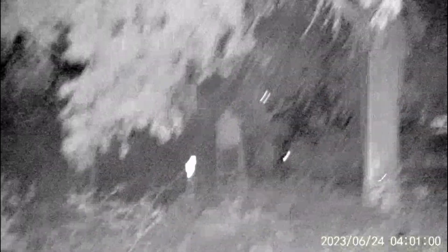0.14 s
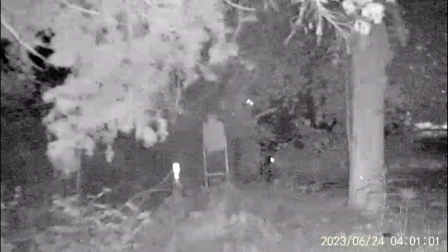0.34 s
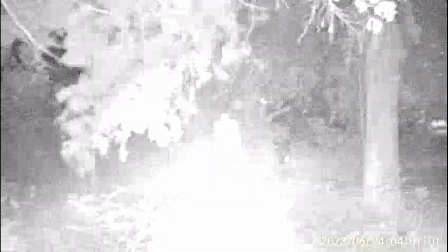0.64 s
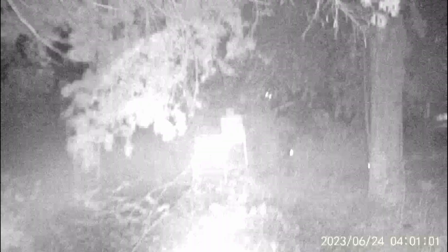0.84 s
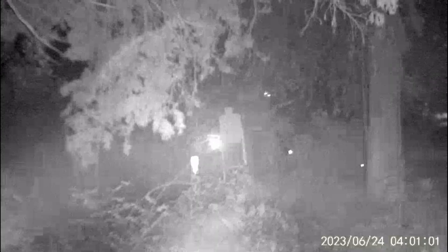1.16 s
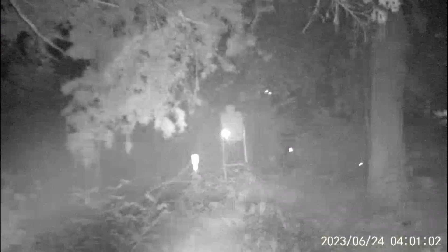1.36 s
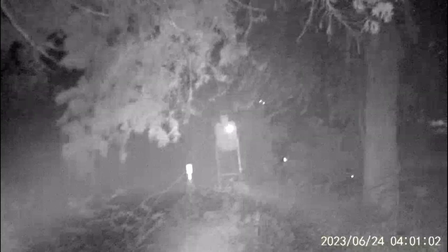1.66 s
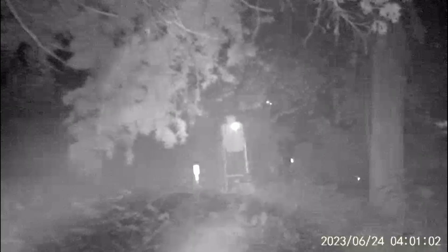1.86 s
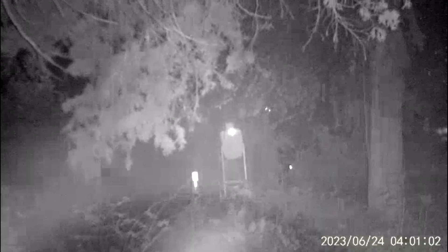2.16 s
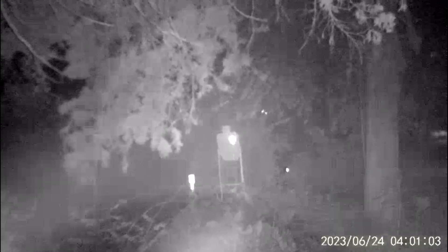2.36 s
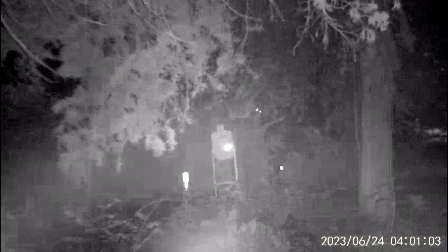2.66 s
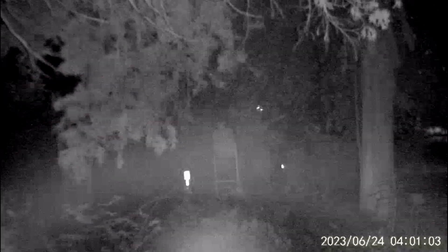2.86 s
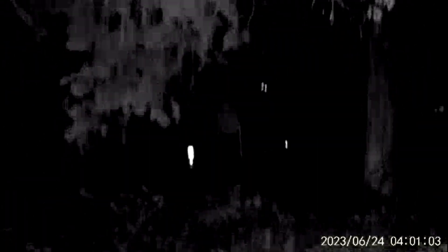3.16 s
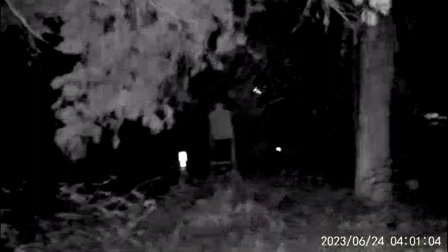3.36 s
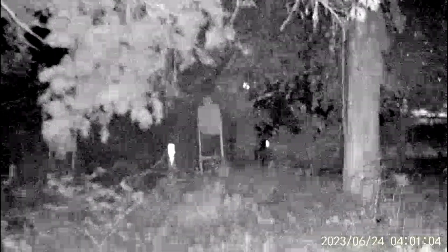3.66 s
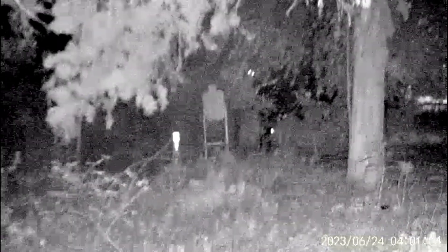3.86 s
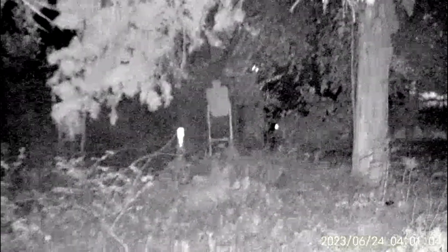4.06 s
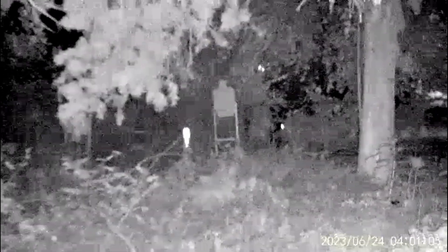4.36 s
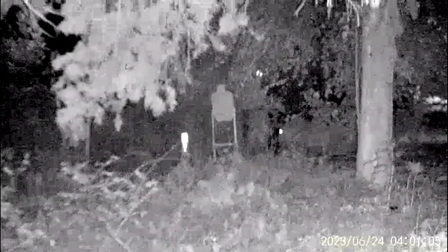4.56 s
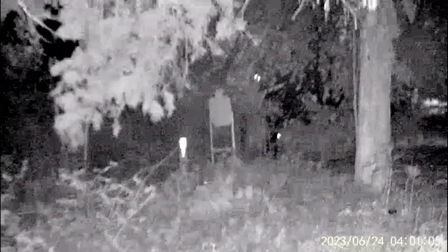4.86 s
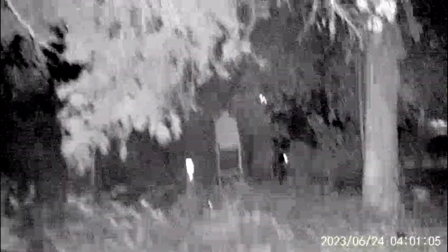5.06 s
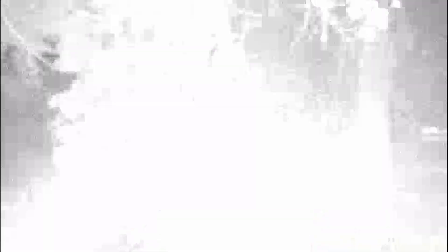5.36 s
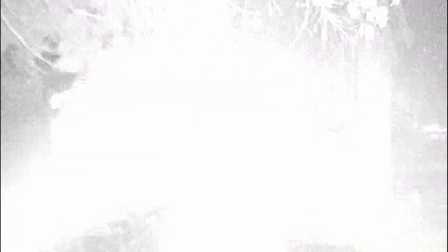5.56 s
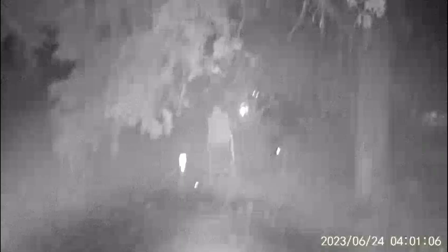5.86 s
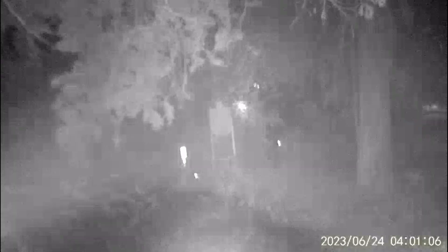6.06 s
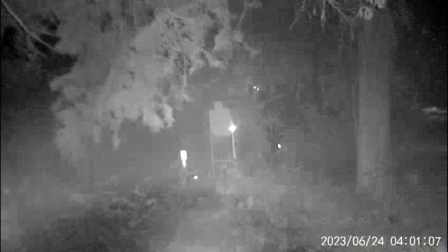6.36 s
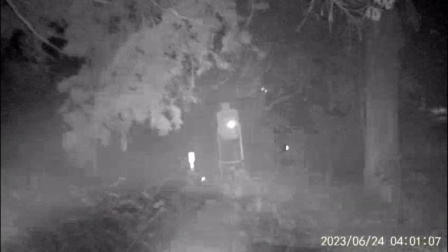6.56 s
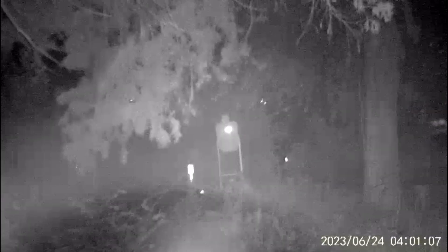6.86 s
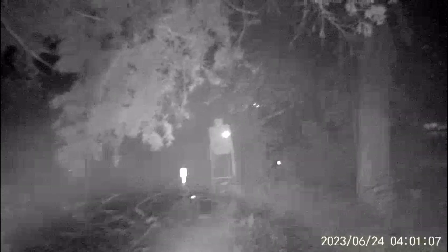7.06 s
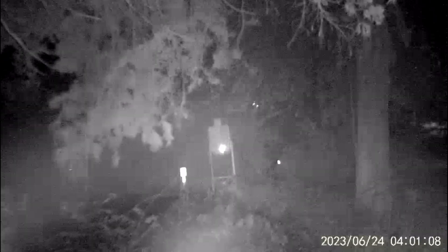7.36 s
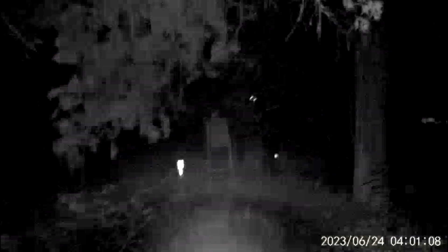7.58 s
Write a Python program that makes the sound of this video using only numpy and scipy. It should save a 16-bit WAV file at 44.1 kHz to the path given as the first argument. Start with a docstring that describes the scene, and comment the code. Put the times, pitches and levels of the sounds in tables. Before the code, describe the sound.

A quiet outdoor night: low rumble, soft air, distant traffic and thin insect hiss. Close to the microphone, cloth rustles and small taps lead to a sharp dry trigger click at 0.36 seconds. Far tyre roar swells gently around 1.5, then fades. A light tick at 1.9 precedes two loud, rapid action cycles at 2.2 and 2.4: latch snap, brief gear whirr, hard clack, swing back and rattling seat, with a short metallic after-ring. Another click lands at 2.8. Sleeves and soft handling sounds pass around 3.3 to 3.6; faint pulsing crickets swell near 4.2. More rustling leads to a fuller click at 5.1, followed immediately by a thin bright reset snap with a tiny spring ring. After quiet, a second, somewhat softer pair of whirring cycles comes at 6.85 and 7.03. A final crisp click at 7.43 gives way to slight rustle and a dull bump.

```python
"""A rifle is dry-fired outdoors at night, right by the microphone: single trigger clicks, two quick pairs of action cycles.
In each cycle a latch lets go, a small drive whirs up to speed, and the parts stop, swing back and seat.
Contacts are bursts of tiny impacts ringing damped modes; the drive is gliding gear tones over grinding noise.
Sleeves rustle as shaped noise. Behind lie a low rumble, far traffic that fades, faint pulsed crickets and a thin hiss.
The recorder's gain ducks in the loud cycles."""
import sys
import numpy as np
from scipy import signal
from scipy.fft import rfft, irfft, next_fast_len
from scipy.io import wavfile
from scipy.ndimage import map_coordinates

SR = 44100
rng = np.random.default_rng(int(sys.argv[2]) if len(sys.argv) > 2 else 0)


def unload_audio(sound):
    """Save the sound as a 16-bit wav file, at the path given as the first command line argument."""
    columns = np.transpose(np.atleast_2d(sound))
    # keep every value between -1 and 1, then stretch to whole-number steps
    steps = np.round(np.clip(columns, -1, 1) * 32767)
    wavfile.write(sys.argv[1], SR, steps.astype(np.int16))


N = 340452
TIME = np.arange(N) / SR

# Contact tables: each level_db is taken before the gain_db given to clicks();
# low_db and high_db tilt the low and high modes, before a random scatter.
# trigger clicks: start_s, level_db, low_db, high_db
TRIGGER = [(0.3572, -20, 4, -2.5), (2.8274, -19, -5, -1.5), (5.0922, -15, 2, 0), (7.4327, -15, -2.5, -1.5)]
# the sear slips just before the hammer falls: start_s, level_db, low_db, high_db
SEAR = [(0.3526, -35, -3, -3.5), (2.8248, -22.5, -3, -2), (5.0895, -29, -2, 3), (7.4287, -24.5, 4, -4)]
# the trigger resets, one contact: start_s, level_db, low_db, high_db
RESET = (5.161, -19, -0.5, 1)
# ringing spring of the reset: pitch_hz, level_db, t60_s
RESET_PING = (2715, -40, 0.19)
# light metal contacts: start_s, level_db, low_db, high_db
TICKS = [(1.9325, -30.5, -2, -11), (2.3702, -28.5, -3, -3), (6.8089, -31.5, -4.5, -11.5),
         (6.9115, -17.5, -5.5, 0.5), (7.0112, -31.5, 3, -1), (7.6465, -42.5, 0, -3)]
# sharp snags and bounces within the cycles: start_s, level_db, low_db, high_db
SNAGS = [(2.2176, -20.5, -1, -4), (2.2568, -13.5, -2, -4.5), (2.4535, -10.5, 1, -2), (6.8752, -25.5, 3, -4),
         (6.9148, -12.5, -9, -3.5), (7.0662, -27, 6, -5), (7.1412, -18, 1, -4)]
# soft handling taps: start_s, level_db (before gain_db), pitch_hz
TAPS = [(0.102, -45.5, 2280), (0.2944, -44.5, 2820), (0.3192, -33.5, 3530), (0.856, -58, 4450),
        (3.097, -48, 1900), (3.426, -38.5, 2470), (3.456, -45, 3660), (3.5837, -43.5, 2570),
        (4.5439, -55, 2780), (4.6478, -51.5, 2384), (5.0479, -42, 3700), (5.6516, -57.5, 4000)]
# dull bumps of the stock against the body: peak_s, level_db
BUMPS = [(0.335, -38), (2.884, -36.5), (3.37, -40), (7.69, -39.5)]
# moves of the arms: turn_s (rise gives way to fall), level_db, rise_db_per_s, fall_db_per_s
MOVES = [(0.33, -52.5, -0.5, 37.5), (2.62, -59, 40, 33), (3.26, -47.5, 55.5, 57), (3.65, -67, 17, 22),
         (4.73, -57.5, 45, 32), (5.04, -46.5, 64.5, 54), (5.22, -49, 58, 77.5), (7.28, -62.5, 30, 54),
         (7.7, -54, 33, 30)]
# cycles of the action: unlatch_s, top_speed_s, stop_s, swing_s, seat_s,
# stop_db (level before gain_db), seat_low_db (low modes of the seating)
CYCLES = [(2.1854, 2.241, 2.2545, 2.2704, 2.2968, -9.5, 0.5),
          (2.3874, 2.439, 2.45, 2.4657, 2.4842, -8.5, -1),
          (6.8506, 6.898, 6.9143, 6.9266, 6.9595, -14.5, -1.5),
          (7.0347, 7.086, 7.103, 7.118, 7.1356, -17, -0.5)]

# What each part rings with, in seven tables: pitch_hz, width_hz, level_db (relative)
SEAR_MODES = [(1568, 200, -13.5), (2830, 440, 0), (3300, 300, -4.5), (4800, 350, -8), (7500, 600, -11.5),
              (8650, 500, -10), (14600, 2000, -23.5)]
TRIGGER_MODES = [(580, 130, -7.5), (1056, 120, -15.5), (1574, 147, -4.5), (2150, 140, -5), (2790, 270, -1),
                 (3130, 250, -4), (3580, 140, -7), (4400, 250, -4.5), (4930, 200, -5.5), (5970, 260, -4),
                 (7120, 380, -3.5), (8570, 330, 0), (9510, 270, -7), (11200, 460, -12), (14000, 1300, -12)]
RESET_MODES = [(1060, 150, -9.5), (1570, 200, -9), (2570, 210, -7.5), (3670, 160, -4), (4620, 370, 1.5),
               (5530, 170, -1.5), (7130, 330, 1.5), (8500, 300, -6), (10000, 400, -9), (11070, 450, -6),
               (13600, 600, -8), (15300, 450, -9)]
UNLATCH_MODES = [(560, 200, -21), (940, 86, -6), (1520, 170, -8), (1920, 200, -1), (2360, 410, -4),
                 (3380, 240, -2), (4130, 510, -7.5), (4896, 280, -4), (6050, 650, -14.5), (8400, 290, -13),
                 (13100, 250, -8.5), (15000, 500, -14)]
STOP_MODES = [(850, 370, -16.5), (1500, 160, -2), (2070, 300, -12.5), (3030, 380, -4), (4060, 270, -6),
              (4680, 210, -9.5), (7300, 410, -10), (9200, 150, -15.5), (14150, 300, -16)]
SWING_MODES = [(880, 140, -6), (1570, 200, -14), (2470, 140, 3.5), (2880, 220, 1), (3300, 260, -9.5),
               (4320, 220, 2), (4700, 200, -3.5), (5740, 310, -5.5), (8600, 400, -5.5), (15400, 2700, -22)]
SEAT_MODES = [(599, 220, -18.5), (966, 95, -1), (1470, 120, -3.5), (2350, 540, -4.5), (3186, 210, 2),
              (4370, 300, 1), (4950, 200, -8), (5806, 250, -9), (7240, 560, -2.5), (8710, 260, -14.5),
              (14400, 900, -18.5)]
# the modes of light contacts and small parts: pitch_hz, width_hz, level_db (relative)
TICK_MODES = [(1510, 180, -2), (2340, 1100, 1), (3070, 770, -2.5), (4200, 1100, -12), (7670, 790, -1.5)]
# springs that ring on after the contacts: pitch_hz, level_db (before a 27 dB cut), t60_s
SPRINGS = [(930, -43.5, 0.53), (1080, -41.5, .3), (1640, -39.5, 0.84), (2740, -36.5, 0.1),
           (2850, -35, 0.13), (3320, -42.5, 0.2), (3900, -40, .14), (4850, -42, .15), (7450, -43, .12)]
# other gear tones: multiple of the tooth rate, level_db (relative)
GEARS = [(0.212, -4), (.375, -5.5), (.5, 2), (.625, -6), (2, -15.5), (3, -13.5), (4, -17.5)]

# Noise colours; each is brought to rms 1 before its level is set.
# sliding cloth: freq_hz, level_db (per Hz, relative)
CLOTH = [(500, -29.5), (1500, -6), (2400, -2), (5000, -1.5), (7800, -2), (10500, -11.5), (14000, -8.5),
         (16000, -16)]
# grinding of the drive: freq_hz, level_db (per Hz, relative)
GRIND = [(180, -59), (300, -15), (950, -9.5), (1080, -2.5), (1230, -11), (1490, 0), (1750, -10), (2360, -9),
         (3520, -5), (4090, -12.5), (5700, -15.5), (7570, -15.5), (10900, -24.5), (11700, -31),
         (14500, -24.5), (16000, -40.5)]
# night air: freq_hz, level_db (per Hz, relative)
AIR = [(12, -46), (20, -25.5), (60, 0), (150, -9), (255, -15), (377, -11), (410, -8.5), (446, -9),
       (499, -8.5), (759, -11), (1480, -18), (2100, -26), (3340, -36.5), (4420, -40.5), (5380, -45),
       (8300, -48), (10600, -64.5), (13300, -55.5), (16000, -57.5)]
# low outdoor rumble: freq_hz, level_db (per Hz, relative)
RUMBLE = [(13, -42), (22, -15.5), (46, -5.5), (65, 3), (106, -3), (129, -4), (170, -4), (257, -10.5),
          (300, -26), (390, -54), (660, -120)]
# far roar of tyres: freq_hz, level_db (per Hz, relative)
TYRES = [(250, -23), (550, 0.5), (900, 0), (1500, -11), (2600, -29), (5000, -49)]

# decay of the scatter from things nearby: freq_hz, t60_s
SURROUND = [(300, 0.22), (2000, 0.19), (4500, 0.21), (7500, 0.18), (14000, 0.21)]
# far traffic hums that draw away: pitch_hz, level_db (at the start), fade_db_per_s, waver_hz
HUMS = [(421, -51.5, 2.3, 1.6), (492.3, -52, 3, 8)]
# far crickets: pitch_hz, level_db (before the swell), pulses_per_s (mean)
CRICKETS = [(4240, -75.5, 20), (4430, -74, 28), (4900, -81.5, 42)]

# the same in every cycle: level_db (before gain_db), low_db, high_db
UNLATCH_BLOW, SWING_BLOW, REBOUND_BLOW = (-12, .3, .3), (-13, .3, -4.5), (-20.5, 3, -8)
# colour of the stop: low_db, high_db
STOP_COLOUR = (-.5, -2)
SEAT_DB, SEAT_HIGH_DB = -8.5, -2.5  # seating blow before gain_db, and tilt of its high modes
REBOUND_S = .0108  # the parts rebound this long after the swing

# contacts: spread of the tiny impacts, depth of spectral levelling (share of the mean),
# random shift of the modes (share), spread of the low and high tilts
CHATTER_SPIKE_DB, CHATTER_NOTCH = 4.5, .9
MODE_SHIFT, BLOW_SCATTER_DB = .012, 1
TICK_TOP_HZ = 7960  # light contacts are soft: their treble rolls off above this
TAP_WIDTH_HZ = 300
BUMP_HZ, BUMP_S = 62, 0.018  # pitch, half width
SPRING_BLUR_HZ = 32  # wander of the springs' pitch
SLIDE_WAVER_DB, SLIDE_GRAIN_DB = 1.5, 1.24  # slow and fine unevenness of the cloth

# drive: gear tooth rate towards the start, at the top, coasting; half widths of rise and sag
SLOW_HZ, FAST_HZ, COAST_HZ = 2850, 3640, 2850
SURGE_S, SAG_S = .021, .036
DRIVE_LAG_S = 0.0039  # after the latch
GRIND_DB, RATTLE_DB = -35.5, 3  # grinding level, and depth of its uneven bursts
WHINE_DB, WHINE_DB_PER_OCTAVE, TOOTH_DB = -41, 4, -2  # whine at top speed; tooth tone relative to it
SQUEAL_DB, LOAD_LEAD_S, LOAD_S = -30, 0.0077, 0.011  # load peaks this long before top speed; half width
GRIT_DB, GRIT_SPREAD_DB = -34, 2.5  # catching teeth: level before gain_db, spread
CLATTER_DB, CLATTER_GAP_S, CLATTER_DB_PER_S = -26, 0.0035, 551  # level before gain_db, spacing scale, decay

TYRES_DB, TYRES_S, TYRES_WIDTH_S = -50, 1.55, .8  # peak level, when it is loudest, half width
AIR_DB, AIR_FADE_DB, AIR_FADE_S = -45.5, 1.38, 5  # level at the start, drop, time the drop takes
HISS_DB = -72.5  # before the swell
CRICKET_SWELL_DB, CRICKET_SWELL_S, CRICKET_SWELL_WIDTH_S = 5.5, 4.15, .75  # height, peak, half width
TRILL_SCATTER = .3  # unevenness of the pulse rate, share

DUCK_DB, DUCK_S = -18.5, 0.07  # gain turns down near this rms level, and follows it this slowly
TOP_HZ = 16100  # band limit of the recorder


def amp(db):
    """Decibels to gain."""
    return 10 ** (np.asarray(db) / 20)


def unit(x):
    """x at rms 1."""
    return x / np.sqrt(np.mean(x ** 2) + 1e-20)


def along(points, hz):
    """(Hz, value) points read on a log frequency axis."""
    f, v = np.transpose(points)
    return np.interp(np.log(hz + 1), np.log(f + 1), v)


def wobble(rate):
    """A smooth random curve, rate knots a second."""
    knots = rng.standard_normal(int(N * rate / SR) + 4)
    return map_coordinates(knots, [TIME * rate])


def filtered(x, gain):
    """x times a gain that is a function of frequency."""
    m = next_fast_len(N + SR // 2)
    return irfft(rfft(x, m) * gain(np.fft.rfftfreq(m, 1 / SR)), m)[:N]


def noise(spectrum):
    """Noise of rms 1 with the given colour."""
    return unit(filtered(rng.standard_normal(N), lambda hz: amp(along(spectrum, hz))))


def causal(gain):
    """The minimum-phase response with this gain: it rings only after the blow."""
    cepstrum = irfft(np.log(np.maximum(gain, 1e-6)))
    half = len(cepstrum) // 2
    return np.exp(rfft(np.r_[cepstrum[0], 2 * cepstrum[1:half], np.zeros(half)]))


def chatter(t, life, count=3):
    """Force of two parts meeting: a few ms of tiny, uneven impacts that leave a few spectral notches."""
    envelope = np.sqrt(t / life) * np.exp(-t / life)
    spikes = amp(CHATTER_SPIKE_DB * rng.standard_normal(len(t)))
    force = rng.standard_normal(len(t)) * spikes * envelope
    for _ in range(count):
        # level the strong bands, then keep the burst short
        z = rfft(force)
        levelled = z / np.hypot(np.abs(z), CHATTER_NOTCH * np.abs(z).mean())
        force = irfft(levelled) / (1 + (t / (2 * life)) ** 4)
    return force


def clicks(contacts, modes, life, gain_db, size=2048):
    """Every contact chatters into damped modes, randomly shifted, with its low or high ones favoured."""
    out = np.zeros(N + size)
    t, hz = np.arange(size) / SR, np.fft.rfftfreq(size, 1 / SR)
    centres, widths, levels = np.transpose(modes)[:, :, None]
    # small parts radiate little far below their lowest mode, from about a seventh of its pitch down
    small = hz ** 2 / (hz ** 2 + (0.15 * modes[0][0]) ** 2)
    for s, db, low_db, high_db in contacts:
        c = centres * (1 + MODE_SHIFT * rng.standard_normal(centres.shape))
        resonance = (amp(levels) * hz * widths) ** 2 / ((c * c - hz * hz) ** 2 + (hz * widths) ** 2)
        body = np.sqrt(np.sum(resonance, axis=0))
        low_db, high_db = rng.normal([low_db, high_db], BLOW_SCATTER_DB)
        colour = amp(along([(1700, low_db), (2300, 0.0088), (5300, 0.0074), (6700, high_db)], hz))
        click = irfft(rfft(chatter(t, life)) * causal(body * small * colour))
        out[round(s * SR):][:size] += amp(db + gain_db) * unit(click)
    return out[:N]


def chorus_db():
    """The insect chorus swells for a while, along a bell curve in dB."""
    return CRICKET_SWELL_DB * np.exp(-((TIME - CRICKET_SWELL_S) / CRICKET_SWELL_WIDTH_S) ** 2)


def traffic():
    """Far traffic: wavering hums that draw away, and a tyre roar that swells once and fades."""
    hum = np.zeros(N)
    for hz, db, fade, waver_hz in HUMS:
        level = amp(db - fade * TIME + 2 * wobble(5))
        hum += level * np.sin(2 * np.pi * np.cumsum(hz + waver_hz * wobble(20)) / SR)
    swell = np.exp(-((TIME - TYRES_S) / TYRES_WIDTH_S) ** 2)
    return hum + amp(TYRES_DB) * swell * noise(TYRES)


def night():
    """Low rumble, soft air noise and far traffic, with a narrow band of insect hiss."""
    rumble = amp(-51.0 + 1.2 * wobble(7.5)) * noise(RUMBLE)
    air_db = AIR_DB - AIR_FADE_DB * np.clip(TIME / AIR_FADE_S, 0, 1) + 0.56 * wobble(1.7)
    air = amp(air_db) * noise(AIR)
    hiss = noise([(3600, -27.5), (4200, -1.5), (4500, -2.5), (5200, -27.5)])
    return rumble + air + traffic() + amp(HISS_DB + chorus_db()) * hiss


def crickets():
    """A few far crickets trill in quick pulses of uneven spacing, strength and pitch."""
    out = np.zeros(N)
    for hz, db, rate in CRICKETS:
        pulses = np.sin(np.pi * np.cumsum(rate * (1 + TRILL_SCATTER * wobble(30))) / SR) ** 2
        tone = np.sin(2 * np.pi * np.cumsum(hz + 50 * wobble(120)) / SR)
        out += amp(db + chorus_db() + 3 * wobble(17)) * pulses * tone
    return out


def sleeves():
    """Cloth slides as the rifle is raised and lowered: noise that swells and ebbs, with a fine uneven grain."""
    power = np.zeros(N)
    for s, db, rise, fall in MOVES:
        power += amp(db - np.maximum(rise * (s - TIME), fall * (TIME - s))) ** 2
    uneven = amp(SLIDE_WAVER_DB * wobble(18) + SLIDE_GRAIN_DB * wobble(700))
    return np.sqrt(power) * unit(uneven * noise(CLOTH))


def handling():
    """Soft taps of the hands and fittings: one narrow resonance on a broad, dull knock."""
    out = np.zeros(N)
    for s, db, hz in TAPS:
        modes = [(hz, TAP_WIDTH_HZ, 0), (2800, 2000, -13)]
        out += clicks([(s, db, -3, -6)], modes, life=0.0024, gain_db=-12.0)
    return out


def bumps():
    """The stock bumps softly: a low push that swells and dies within a few periods."""
    out = np.zeros(N)
    for s, db in BUMPS:
        t = TIME - s
        out += amp(db) * np.exp(-(t / BUMP_S) ** 2) * np.sin(2 * np.pi * BUMP_HZ * t)
    return out


def trigger_clicks():
    """The sear slips, then the hammer falls: two chattering contacts, each ringing its own modes."""
    slip = clicks(SEAR, SEAR_MODES, life=0.0019, gain_db=-6.5)
    return slip + clicks(TRIGGER, TRIGGER_MODES, life=0.0021, gain_db=-7.0)


def springs(x):
    """Lightly damped springs, shaken by the contacts; their coils touch, which blurs the pitch."""
    t = TIME[:SR // 2]
    ring = np.zeros(len(t))
    for hz, db, t60 in SPRINGS:
        pitch_hz = hz + SPRING_BLUR_HZ * wobble(250)[:len(t)]
        ring += amp(db - 27.0 - 60 * t / t60) * np.sin(2 * np.pi * np.cumsum(pitch_hz) / SR)
    return signal.fftconvolve(x, ring)[:N]


def surroundings(x):
    """A short, weak scatter from things nearby: decaying noise whose decay time varies with pitch."""
    hz, t, z = signal.stft(rng.standard_normal(SR // 2), SR, nperseg=256)
    decay = amp(-60 * t / along(SURROUND, hz)[:, None])
    tail = signal.istft(z * decay, SR, nperseg=256)[1]
    return signal.fftconvolve(x, tail / np.linalg.norm(tail))[:N]


def light_contacts():
    """Light metal parts touch softly, so the treble of their broad modes rolls off."""
    ticks = clicks(TICKS, TICK_MODES, life=0.0023, gain_db=-10.5)
    return filtered(ticks, lambda hz: 1 / np.sqrt(1 + (hz / TICK_TOP_HZ) ** 4))


def action():
    """Each cycle: the latch lets go, the parts stop, swing back, rebound and seat; now and then one snags."""
    unlatch, stop, swing, seat, rebound = [], [], [], [], []
    for unlatch_s, _, stop_s, swing_s, seat_s, stop_db, seat_low_db in CYCLES:
        unlatch.append((unlatch_s, *UNLATCH_BLOW))
        stop.append((stop_s, stop_db, *STOP_COLOUR))
        swing.append((swing_s, *SWING_BLOW))
        seat.append((seat_s, SEAT_DB, seat_low_db, SEAT_HIGH_DB))
        rebound.append((swing_s + REBOUND_S, *REBOUND_BLOW))
    return (clicks(unlatch, UNLATCH_MODES, life=0.0027, gain_db=-10.0)
            + clicks(stop, STOP_MODES, life=0.0041, gain_db=-14.5)
            + clicks(swing, SWING_MODES, life=0.0013, gain_db=-7.5)
            + clicks(seat, SEAT_MODES, life=0.002, gain_db=-10.0)
            + clicks(rebound, TICK_MODES, life=0.0035, gain_db=-13.5)
            + clicks(SNAGS, TICK_MODES, life=.0012, gain_db=-15.5))


def grit(count=9):
    """While the drive runs, single teeth catch at uneven moments."""
    contacts = []
    for unlatch_s, _, _, _, seat_s, _, _ in CYCLES:
        for s in rng.uniform(unlatch_s, seat_s, size=count):
            contacts.append((s, GRIT_DB + GRIT_SPREAD_DB * rng.standard_normal(), 0, 0))
    return clicks(contacts, TICK_MODES, life=.0006, gain_db=-16.0)


def drive():
    """The geared drive spins up and coasts down: gliding tooth tones that squeal under load, over grinding."""
    out = np.zeros(N)
    grind = unit(noise(GRIND) * amp(RATTLE_DB * wobble(420)))
    for unlatch_s, top_s, _, _, seat_s, _, _ in CYCLES:
        run = slice(round((unlatch_s + DRIVE_LAG_S) * SR), round(seat_s * SR))
        t = TIME[run] - top_s
        # the tooth rate peaks at top speed, with a quicker rise than sag
        rest_hz = np.where(t < 0, SLOW_HZ, COAST_HZ)
        surge = np.exp(-(t / np.where(t < 0, SURGE_S, SAG_S)) ** 2)
        tooth_hz = rest_hz + (FAST_HZ - rest_hz) * surge
        turns = np.cumsum(tooth_hz * (1 + 0.0077 * wobble(400)[run])) / SR  # in tooth periods
        tooth = np.sin(2 * np.pi * turns)
        whine = amp(TOOTH_DB) * tooth
        for order, level in GEARS:
            whine = whine + amp(level) * np.sin(2 * np.pi * (order * turns + rng.random()))
        whine_db = WHINE_DB + WHINE_DB_PER_OCTAVE * np.log2(tooth_hz / FAST_HZ)
        load = np.exp(-((t + LOAD_LEAD_S) / LOAD_S) ** 2)
        squeal = load * (tooth + amp(-16) * np.sin(4 * np.pi * turns))
        tones = amp(whine_db) * whine + amp(SQUEAL_DB) * squeal
        out[run] += signal.windows.tukey(len(t), .1) * (amp(GRIND_DB) * grind[run] + tones)
    return out


def clatter():
    """After each seating, loose parts rattle in a quick run of mostly weakening contacts."""
    contacts = []
    for _, _, _, _, seat_s, _, _ in CYCLES:
        for delay in np.cumsum(CLATTER_GAP_S * rng.uniform(0.5, 1.3, size=7)):
            level_db = CLATTER_DB - CLATTER_DB_PER_S * delay + rng.normal(0, 2)
            contacts.append((seat_s + delay, level_db, 0, 0))
    return clicks(contacts, STOP_MODES, life=.0012, gain_db=-16.0)


def reset():
    """The trigger resets with a thin, bright snap, and its spring sings briefly."""
    hz, db, t60 = RESET_PING
    t = np.maximum(TIME - RESET[0], 0)
    tone = np.sin(2 * np.pi * np.cumsum(hz + SPRING_BLUR_HZ * wobble(250)) / SR)
    ping = (t > 0) * amp(db - 60 * t / t60) * tone
    return clicks([RESET], RESET_MODES, life=0.0015, gain_db=-6.5) + ping


def scene():
    """Trigger and action with their after-ring, and the shooter's handling, over the night background."""
    background = night() + crickets()
    body = sleeves() + handling() + bumps()
    trigger = trigger_clicks()
    ticks = light_contacts()
    cycling = amp(1.0) * (action() + grit() + drive() + clatter())
    rifle = trigger + ticks + cycling + reset()
    scatter = surroundings(amp(-20.5) * cycling + amp(-24.5) * (trigger + ticks))
    return rifle + springs(rifle) + scatter + body + background


def record(dry):
    """A slow gain control ducks in the loud cycles, peaks are rounded off, and the band is cut at its top."""
    keep = np.exp(-1 / (DUCK_S * SR))
    power = signal.lfilter([1 - keep], [1, -keep], dry ** 2)
    ducked = dry / np.sqrt(1 + power / amp(DUCK_DB) ** 2)
    rounded = ducked / (1 + np.abs(ducked / .95) ** 6) ** (1 / 6)
    return filtered(rounded, lambda hz: 1 / np.sqrt(1 + (hz / TOP_HZ) ** 160))


dry = scene()
out = record(dry)
unload_audio(out)
```